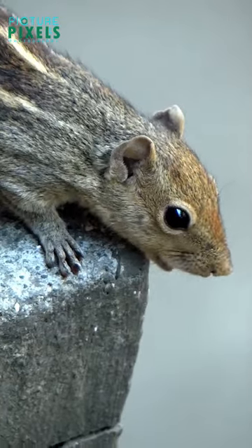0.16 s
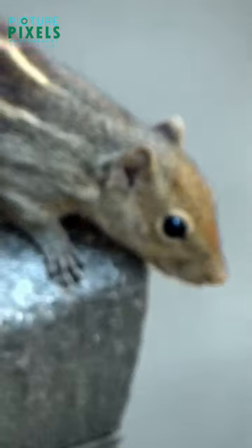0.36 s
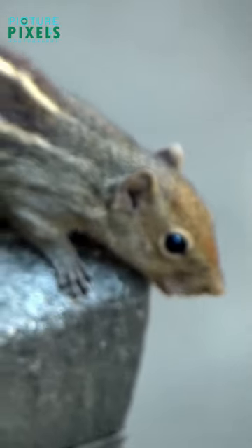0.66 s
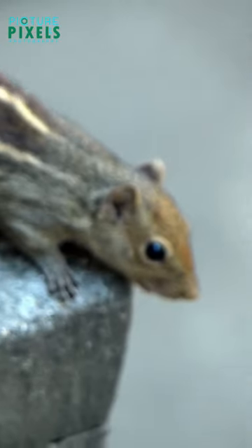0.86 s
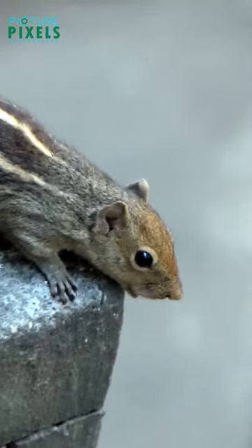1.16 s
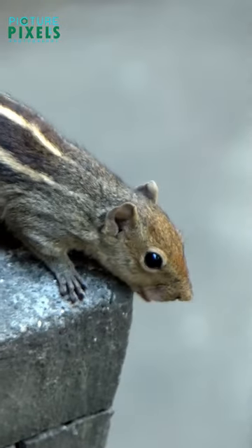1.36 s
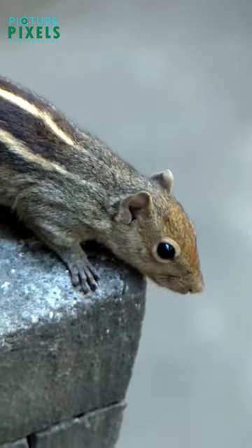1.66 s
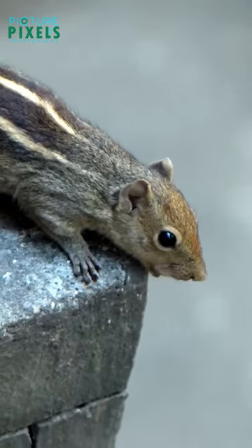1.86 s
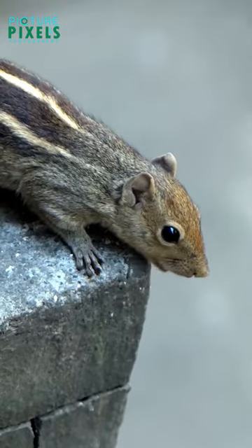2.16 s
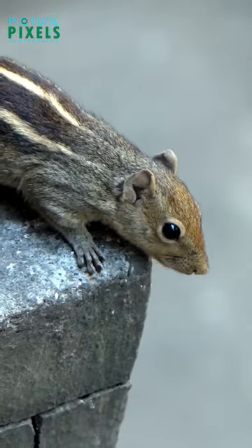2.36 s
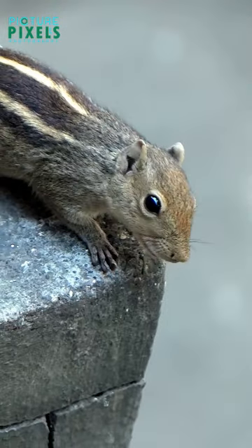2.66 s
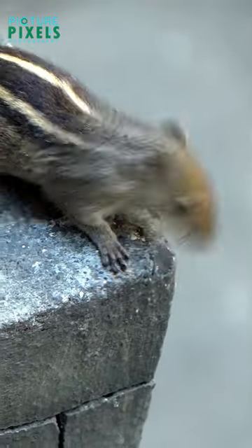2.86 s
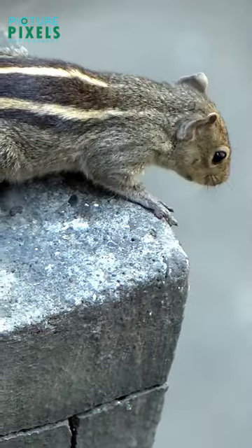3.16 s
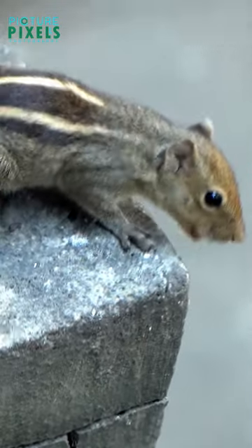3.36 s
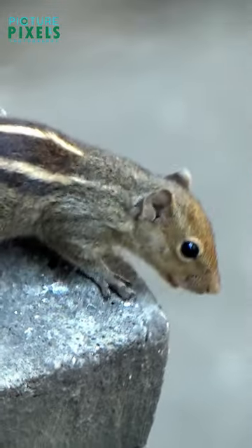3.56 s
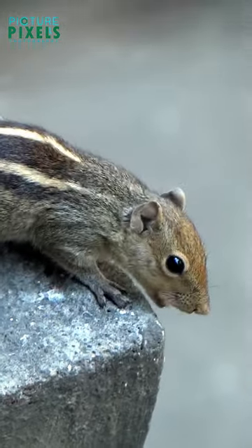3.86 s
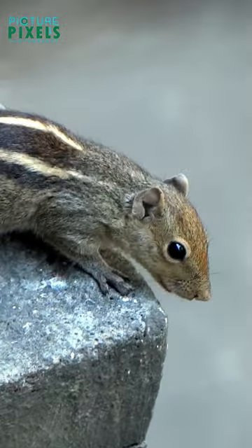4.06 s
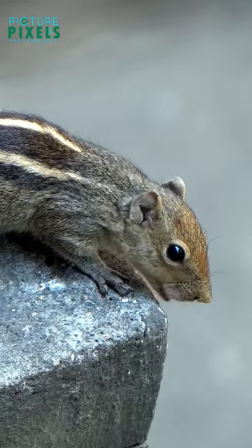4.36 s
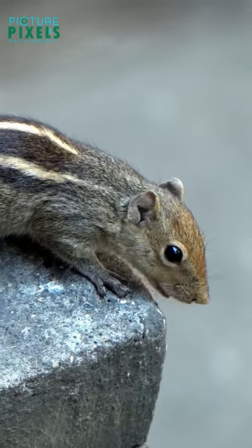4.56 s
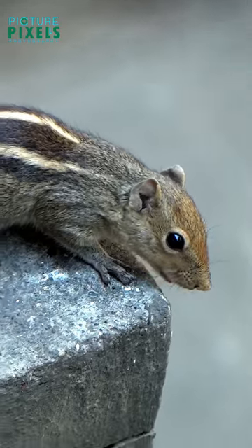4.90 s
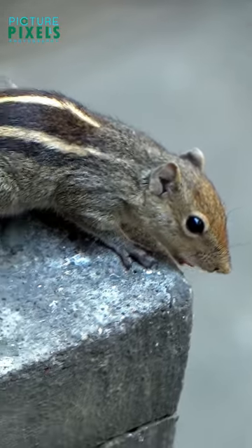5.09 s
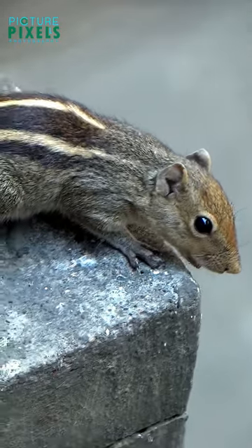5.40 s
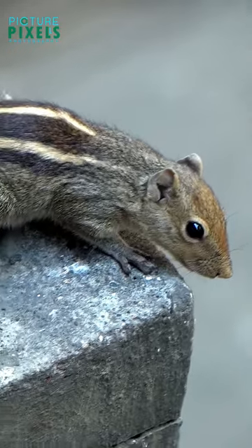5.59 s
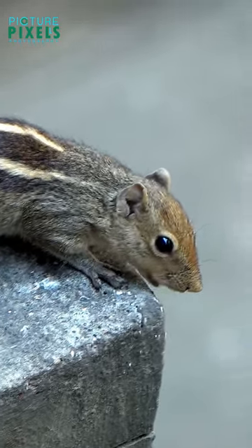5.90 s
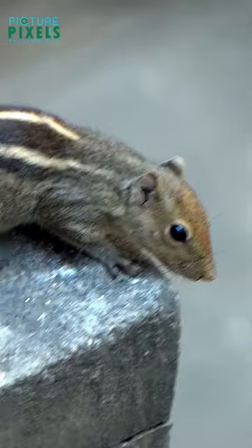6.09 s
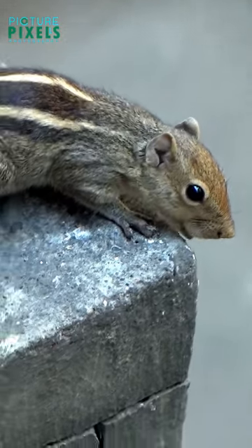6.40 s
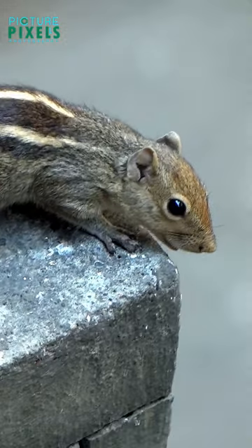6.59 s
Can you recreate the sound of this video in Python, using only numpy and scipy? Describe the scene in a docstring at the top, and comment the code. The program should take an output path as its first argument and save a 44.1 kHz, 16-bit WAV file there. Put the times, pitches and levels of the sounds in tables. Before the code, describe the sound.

Outdoors among hard walls, a squirrel calls in steady pairs: a bright chirp arching up and falling, then a lower upward chip. Tiny squeaks lead into some calls. Echoes return at once and again a tenth of a second later. Two short nasal horn beeps come early, one longer than the other. Faint far tones and low traffic murmur stay well underneath the loud, close, slightly compressed calls.

```python
"""A squirrel on a stone ledge chirps in pairs: an arched note, then a short rising one, of three partials.
Nearby walls return each chirp at once, a far wall a tenth of a second later: smeared noise bursts and a tail.
A hum and thin far tones are sines smeared by scattering; the town's murmur is filtered stereo noise.
A small horn beeps twice as a stack of harmonics; brief squeaks of three harmonics accompany the chirps."""
import sys
import numpy as np
from scipy import signal
from scipy.io import wavfile
from scipy.ndimage import uniform_filter1d, minimum_filter1d

SR = 44100
rng = np.random.default_rng(int(sys.argv[2]) if len(sys.argv) > 2 else 0)


def volts_from_decibels(level):
    """Turn decibel levels (scalar or array-like) into linear amplitude factors."""
    exponent = np.asarray(level, float) / 20
    return 10 ** exponent


def pcm_store(signal):
    """Save signal as 16-bit PCM."""
    levels = np.round(np.clip(np.atleast_2d(signal), -1, 1) * 32767)
    wavfile.write(sys.argv[1], SR, levels.astype(np.int16).T)


N = 297234
LEAD = SR // 5   # samples of sound before time zero, so that earlier echoes are there

# Arched chirps: (crest time [s], crest pitch [Hz], relative level [dB], full voice before crest [s],
# end after crest [s], extra second harmonic [dB])
ARCHES = [(-0.03, 3457, -4, 0.025, .075, 0), (0.565, 3525, -9, .03, .056, -1),
          (1.149, 3457, -6.5, .012, .088, -3), (1.889, 3450, -7, .012, .054, -2),
          (3.681, 3588, -4, .015, .082, -1), (4.253, 3543, -5.5, .042, .076, -1),
          (5.193, 3527, -10, .016, .048, -1)]
# Chirps led in by a squeak, which start on the crest pitch and only fall: (crest time [s],
# crest pitch [Hz], relative level [dB], full voice before crest [s], end after crest [s],
# extra second harmonic [dB])
FALLS = [(2.6, 3470, -9, .008, .026, 1), (3.345, 3460, -3, .026, .026, 2), (5.828, 3520, -9, .009, .042, 0),
         (6.301, 3580, -6, .012, .08, -1)]
# Pitch is crest x (1 - (time to crest / climb) ^ bend), then falls by a share of the crest
CLIMB_S, CLIMB_BEND, FALL_SHARE, FALL_S = .12, 1.7, .195, .066
# A faint climb comes before the full voice
WHISPER_S, WHISPER_DB, VOICE_ATTACK_S = .052, -17, .013
# Level sinks as the pitch leaves a point just under the crest, and is lower while it still climbs
FADE_DB_PER_SHARE, LOUDEST_SHARE, CLIMB_DB_PER_SHARE = 78, .03, 90
# Rising chirps: (start [s], length [s], start pitch [Hz], top pitch [Hz], relative level [dB],
# extra second harmonic [dB])
RISES = [(0.119, 0.058, 2320, 2984, -12, 0.5), (0.722, .064, 2316, 3135, -13, -2),
         (1.402, .058, 2400, 3000, -10.5, -3), (2.072, .056, 2270, 3050, -12, 1),
         (3.016, .026, 3000, 3060, -27, 9), (3.411, .05, 2715, 3053, -36, 17),
         (3.868, .056, 2390, 3100, -12, 2.5), (4.423, .056, 2350, 2930, -13, 1),
         (4.722, .08, 2450, 3270, -16, 3), (5.313, .048, 2324, 2980, -13, -4),
         (5.906, 0.031, 2630, 2910, -49, 26), (6.483, .054, 2330, 3010, -11, -3)]
RISE_WAIT_S, RISE_SLIDE_S = .002, .043
# Swell and fade of a rising chirp: (share of length [0-1], level [dB])
RISE_LEVEL = [(0, -6), (.25, -5), (.55, 0), (.8, -2), (1, -10)]
# Second harmonic over the first: (pitch [Hz], level [dB])
SECOND = [(2300, -35.5), (2550, -15.5), (2950, -8), (3500, -4)]
# Third harmonic over the second, by where it sounds: (its frequency [Hz], level [dB])
THIRD = [(7500, -33), (9000, -26.5), (9800, -11), (10800, -11.5)]
# Hoarser chirps, chosen by their end time: (from [s], to [s], rms phase wobble [rad])
HOARSE = [(2.5, 2.7, 0.4), (3.3, 3.5, 0.45), (5.8, 5.9, 0.3)]

# Wall reflections: (delay [s], level [dB], smear [s])
WALLS = [(.003, -1, 0.0021), (.007, -2, 0.0022), (0.012, -3, 0.0025), (0.032, -17.5, 0.0045),
         (0.093, -9.5, 0.0034), (0.13, -14, 0.055)]
TAIL_DB, TAIL_T60_S, TAIL_START_S, TAIL_ALIKE = -6.5, 0.57, 0.017, 0.86

# A low hum that wavers and dies away: (time [s], relative level [dB])
HUM = [(0.0, -37), (0.2, -42.5), (0.48, -37.5), (0.6, -50.5), (1.29, -39), (1.6, -52.5), (2.1, -39.5),
       (2.23, -49), (2.41, -42), (3.0, -57.5)]
HUM_HZ = 222.5
# Thin wavering tones from afar: (start [s], loudest [s], end [s], start pitch [Hz], end pitch [Hz],
# relative level [dB])
FAR_TONES = [(1.47, 1.7, 1.95, 1258, 1200, -28.5), (2.56, 2.88, 3.18, 4700, 4760, -25.5),
             (3.4, 3.58, 4.2, 1480, 1490, -36), (3.37, 3.45, 3.7, 1105, 1095, -35.5),
             (3.8, 4.04, 5.12, 1112, 1112, -32)]
FAR_ENDS_DB = -15   # level at both ends under the loudest

# Spectrum of the town noise: (frequency [Hz], relative level per Hz [dB])
TOWN = [(15, -48), (25, -17.5), (160, -4), (223, -5), (302, -11.5), (361, -3.5), (502, -8.5), (600, -9),
        (773, -10.5), (2310, -16.5), (3130, -29), (4950, -18), (10900, -18.5), (14100, -54), (22000, -120)]
TOWN_DB = -37.5
# Left-right likeness of the town noise: (frequency [Hz], likeness [0-1])
LIKENESS = [(40, .35), (90, .5), (180, .82), (500, .9), (1400, .75), (3000, .82), (10000, .7)]
# Swells of the low-middle murmur: (time [s], relative level [dB])
SWELL = [(0.0, -49.5), (1.12, -43), (1.28, -41.5), (1.71, -47), (2.12, -38), (2.33, -50), (2.91, -53),
         (3.53, -35.5), (3.87, -39), (4.2, -50), (4.35, -45), (4.8, -50), (5.2, -40.5), (5.418, -43.5),
         (5.76, -53), (6.38, -47), (6.74, -48)]

# Horn beeps: (start [s], held [s], relative level [dB], sag [dB/s])
BEEPS = [(0.187, .17, -15, 61), (.393, 0.0624, -13, 5)]
# Horn harmonics: (multiple of the fundamental [1], relative level [dB])
HORN_ORDERS = [(4, -46), (5, 2), (6, -17.5), (7, 0), (8, -7.5), (11, -29.5), (12, -27.5), (13, -28),
               (14, -28.5), (15, -20), (16, -32), (17, -16), (18, -16), (19, -25), (20, -26.5), (21, -24),
               (22, -29)]
HORN_HZ, HORN_DROOP_HZ, BEEP_ATTACK_S, BEEP_RELEASE_S = 402.7, 8, 0.0078, 0.031
LINGER_DB, LINGER_S, LINGER_LOSS_DB = -28, 0.26, 10   # what hangs on in the street after a beep

# Short steady squeaks: (start [s], length [s], pitch [Hz], relative levels of harmonics 1, 2, 3 [dB])
SQUEAKS = [(1.386, .024, 2320, -16, -50, -60), (4.418, .018, 2340, -12, -50, -60),
           (2.542, .04, 1774, -46, -22, -25), (3.001, 0.011, 1967, -20, -38, -24),
           (3.013, .011, 3020, -10, -14, -36), (3.308, 0.023, 1450, -19.5, -72, -68),
           (3.293, 0.053, 1820, -60, -21.5, -25), (4, 0.018, 1930, -22.5, -47, -48),
           (5.79, 0.03, 1930, -46, -26, -42), (5.785, 0.03, 5200, -34, -44, -84),
           (6.262, 0.017, 1880, -41, -25.5, -38)]

# A band this far under the loudest treble is muted: (frequency [Hz], threshold [dB])
MASK_DB = [(1400, -51), (1800, -33.5), (4500, -29), (8500, -29), (9500, -47.5)]
CUTOFF_HZ = 10900


def rms_one(x):
    """Normalization: divides a signal by its root mean square."""
    return x / np.sqrt(np.mean(x ** 2) + 1e-20)


def at_hz(points, hz):
    """Interpolation of a frequency table along a logarithmic frequency axis."""
    table_hz, value = np.transpose(points)
    return np.interp(np.log(hz), np.log(table_hz), value)


def ease(share):
    """Half-cosine step from 0 to 1."""
    return .5 - .5 * np.cos(np.pi * np.clip(share, 0, 1))


def drift(rate_hz, size):
    """Low-passed random process: noise through two equal one-pole filters, run in, with rms 1."""
    r = np.exp(-2 * np.pi * rate_hz / SR)
    noise = rng.standard_normal((size // LEAD + 2) * LEAD)
    slow = signal.lfilter([1], [1, -2 * r, r * r], noise)
    return rms_one(slow[-size:])


def stereo(mid, side, alike):
    """Mid-side synthesis: two channels from unrelated noises, correlated in the degree alike."""
    return np.sqrt(1 + alike) * mid + np.sqrt(1 - alike) * side * [[1], [-1]]


def glide(rows, edge_s):
    """Phase as the integral of frequency: span, pitch, phase, gain, extras from rows (s, Hz, dB, ..)."""
    s, hz, db, *more = np.transpose(rows)
    span = slice(round(s[0] * SR) + LEAD, round(s[-1] * SR) + LEAD)
    t = (np.arange(span.start, span.stop) - LEAD) / SR
    ends = np.clip(np.minimum(t - s[0], s[-1] - t) / edge_s, 0, 1)
    hz = uniform_filter1d(np.interp(t, s, hz), SR // 100, mode="nearest")   # rounds the path's corners
    phase = 2 * np.pi * (np.cumsum(hz) / SR + rng.random())
    gain = np.sqrt(2) * ends * volts_from_decibels(np.interp(t, s, db))   # rms to peak, with soft ends
    return span, hz, phase, gain, [np.interp(t, s, column) for column in more]


def arch(crest, top, db, early, length, bright_db, climbs):
    """Frequency arch tied to level: a climb (or none), then a fall; rows (s, Hz, dB, second harmonic dB)."""
    first = -max(WHISPER_S, early) if climbs else -early - VOICE_ATTACK_S / 2
    t = np.linspace(first, length, num=60)
    before = climbs * (np.maximum(-t, 0) / CLIMB_S) ** CLIMB_BEND
    after = FALL_SHARE * ease(t / FALL_S)
    hz = top * (1 - before - after)
    level = db - CLIMB_DB_PER_SHARE * before - FADE_DB_PER_SHARE * abs(after - LOUDEST_SHARE)
    level = level + WHISPER_DB * ease((-early - t) / VOICE_ATTACK_S + .5)
    return np.transpose([crest + t, hz, level, bright_db + at_hz(SECOND, hz)])


def rise(start, length, low, top, db, bright_db):
    """Upward frequency sweep: pitch waits, slides up and stays; rows (s, Hz, dB, second harmonic dB)."""
    share = np.linspace(0, 1, num=30)
    hz = low + (top - low) * ease((share * length - RISE_WAIT_S) / RISE_SLIDE_S)
    level = db + np.interp(share, *np.transpose(RISE_LEVEL))
    return np.transpose([start + length * share, hz, level, bright_db + at_hz(SECOND, hz)])


def chirps(flutter_db=2.5, wobble_rad=0.3, rasp_rad=1.1):
    """Harmonic whistle: three partials of fluttering level and unsteady phase, the third one raspy."""
    out = np.zeros(N + LEAD)
    calls = [arch(*row, True) for row in ARCHES]
    calls += [arch(*row, False) for row in FALLS]
    calls += [rise(*row) for row in RISES]
    for rows in calls:
        span, hz, phase, gain, (second_db,) = glide(rows, edge_s=0.0025)
        size = len(phase)
        end_s = rows[-1][0]
        unsteady = max([wobble_rad] + [rad for low, high, rad in HOARSE if low < end_s < high])
        phase = phase + unsteady * drift(120, size)
        third_db = second_db + at_hz(THIRD, 3 * hz)
        third_phase = 3 * phase + rasp_rad * drift(200, size)
        for db, turn in [(0, phase), (second_db, 2 * phase), (third_db, third_phase)]:
            out[span] += gain * volts_from_decibels(db + flutter_db * drift(64, size)) * np.sin(turn)
    return out


def yard(x):
    """Reverberation as convolution: walls return smeared bursts and a diffuse tail decays, partly alike."""
    t = np.arange(SR) / SR
    decay = volts_from_decibels(-60 * t / TAIL_T60_S) * np.clip(t / TAIL_START_S, 0, 1)
    envelope = volts_from_decibels(TAIL_DB) * rms_one(decay)
    for delay, db, smear in WALLS:
        burst = rms_one(np.exp(-((t - delay) / smear) ** 2))
        envelope = np.hypot(envelope, volts_from_decibels(db) * burst)   # powers add
    mid, side = rng.standard_normal((2, SR)) * envelope / np.sqrt(SR)
    response = stereo(mid, side, TAIL_ALIKE) / np.sqrt(2)
    low_cut = signal.butter(2, 2000, "high", fs=SR, output="sos")   # low notes scatter less
    x = signal.sosfilt(low_cut, x)
    return signal.fftconvolve(x[None], response, axes=1)[:, :len(x)]


def far_tones(scatter=0.57, blur_per_hz=0.019):
    """Multipath scattering: a steady sine plus random paths that smear it, more widely the higher it is."""
    out = np.zeros(N + LEAD)
    tones = [[(s, HUM_HZ, db) for s, db in HUM]]
    for start, loudest, end, first_hz, last_hz, db in FAR_TONES:
        s = [start, loudest, end]
        hz = np.interp(s, [start, end], [first_hz, last_hz])
        tones.append(np.transpose([s, hz, db + FAR_ENDS_DB * np.array([1, 0, 1])]))
    for rows in tones:
        span, hz, phase, gain, _ = glide(rows, edge_s=0.016)
        rate_hz = blur_per_hz * hz.mean()
        along = scatter * drift(rate_hz, len(hz))
        across = scatter * drift(rate_hz, len(hz))
        out[span] += gain * ((0.4 + along) * np.sin(phase) + across * np.cos(phase))
    return out[LEAD:]


def town(patchy_db=1.6):
    """Band-filtered noise: half-octave stereo bands, each with its own level, flicker and likeness."""
    out, edges = 0, 22 * 2 ** np.arange(0, 9.6, .5)
    white = rng.standard_normal((2, 2, N))   # neighbouring bands get unrelated noise
    for k, (low, high) in enumerate(zip(edges, edges[1:])):
        band = signal.butter(2, [low, high], "band", fs=SR, output="sos")
        mid, side = signal.sosfilt(band, white[k % 2])
        hz = np.sqrt(low * high)
        flicker_db = patchy_db * (1.5 + 60 / hz) * drift(5.4, N)   # the bass is lumpier
        gain = volts_from_decibels(at_hz(TOWN, hz) + flicker_db)
        out = out + gain * stereo(mid, side, at_hz(LIKENESS, hz))
    return volts_from_decibels(TOWN_DB) * rms_one(out)


def murmur():
    """Amplitude-modulated noise: a band of dull noise from traffic, rising and falling on its own."""
    s, db = np.transpose(SWELL)
    band = signal.butter(2, [400, 1400], "band", fs=SR, output="sos")
    noise = signal.sosfilt(band, rng.standard_normal(N))
    return volts_from_decibels(np.interp(np.arange(N) / SR, s, db)) * rms_one(noise)


def horn(fading_db=3.0, wobble_rad=0.035):
    """Buzzing membrane: a harmonic stack whose lines fade in and out on their way through the street."""
    out = np.zeros(N + LEAD)
    for start, held, level_db, sag in BEEPS:
        s = start + np.cumsum([0, BEEP_ATTACK_S, held, BEEP_RELEASE_S, LINGER_S])
        hz = HORN_HZ - HORN_DROOP_HZ * np.array([0, 0, 0, 1, 1])
        level = [LINGER_DB, level_db, level_db - sag * held, LINGER_DB, LINGER_DB - LINGER_LOSS_DB]
        span, _, phase, gain, _ = glide(np.transpose([s, hz, level]), edge_s=0.0034)
        size = len(phase)
        phase = phase + wobble_rad * drift(38, size)
        for k, db in HORN_ORDERS:
            line_db = db - 4.5 + fading_db * drift(23, size)
            out[span] += gain * volts_from_decibels(line_db) * np.sin(k * phase)
    return out


def squeaks(wobble_rad=0.33):
    """Harmonic synthesis: three harmonics on a nearly fixed pitch under a half-sine swell."""
    out = np.zeros(N + LEAD)
    for s, length, hz, *levels_db in SQUEAKS:
        t = np.arange(round(length * SR)) / SR
        phase = 2 * np.pi * hz * t + wobble_rad * drift(83, len(t))
        tone = sum(volts_from_decibels(db) * np.sin(k * phase) for k, db in enumerate(levels_db, 1))
        swell = np.sqrt(2) * np.sin(np.pi * t / length)
        out[round(s * SR) + LEAD:][:len(t)] += swell * tone
    return out


def scene():
    """Superposition: near sources with their echoes, a little louder on the left, over the distant layers."""
    squirrel = chirps() + squeaks()
    beeps = horn()
    echoes = yard(squirrel + volts_from_decibels(-1.5) * beeps)
    near = volts_from_decibels(-0.5) * (squirrel + beeps + echoes)[:, LEAD:]
    near = near * volts_from_decibels([[.9], [-.9]])   # left, right
    return near + far_tones() + town() + volts_from_decibels(-3) * murmur()


def mute_weak_bands(x):
    """Spectral gating: frame by frame, stretches of the spectrum far below the loudest treble are shut."""
    hz, _, z = signal.stft(x, SR, nperseg=2048)
    power = uniform_filter1d(np.mean(np.abs(z) ** 2, axis=0), size=7, axis=0)
    loudest = power[hz > 1900].max(axis=0)
    threshold = volts_from_decibels(2 * at_hz(MASK_DB, hz + 1))[:, None] * loudest   # twice the dB: a power ratio
    weak = power < threshold
    return signal.istft(z * ~weak, SR, nperseg=2048)[1][:, :N]


def top_cut(x):
    """Nothing passes above the cut-off."""
    return signal.sosfilt(signal.butter(12, 11030, fs=SR, output="sos"), x)


def record(dry):
    """Gating, low-pass filtering and limiting: only the tips of peaks reach full scale."""
    low_pass = signal.ellip(12, 1, 60, CUTOFF_HZ, fs=SR, output="sos")   # steep
    x = signal.sosfilt(low_pass, mute_weak_bands(dry))
    # The fast limiter aims 0.9 dB above full scale, and the tips are clipped
    room_left = np.minimum(1, volts_from_decibels(.9) / (np.abs(x).max(axis=0) + 1e-9))
    gain = uniform_filter1d(minimum_filter1d(room_left, size=265), size=265)
    mix = np.clip(x * gain, -1, 1)
    return top_cut(mix)


dry = scene()
out = record(dry)
pcm_store(out)
```